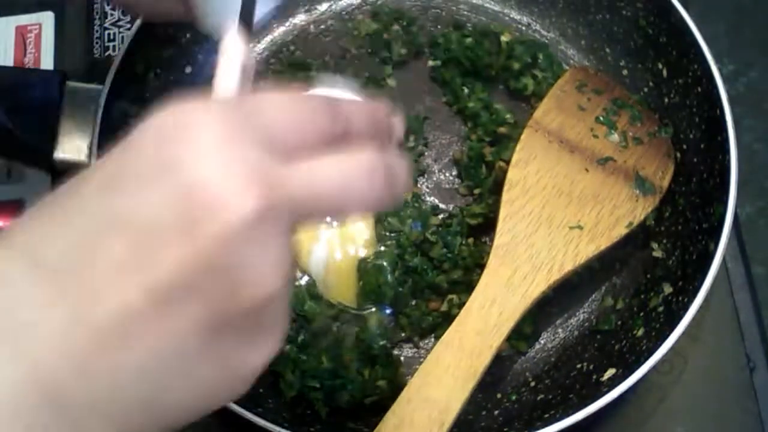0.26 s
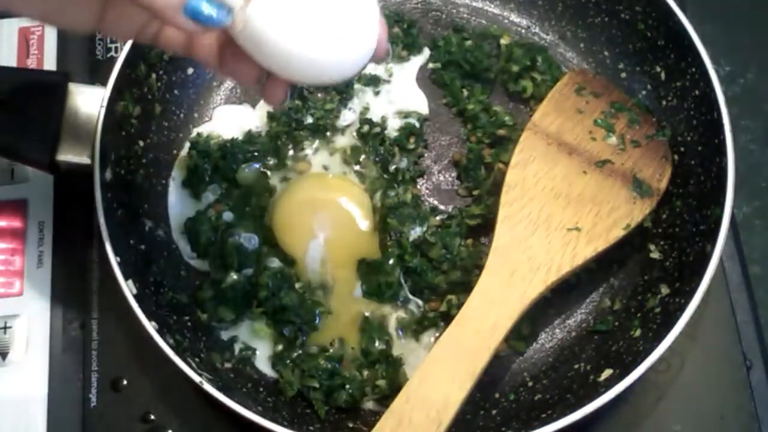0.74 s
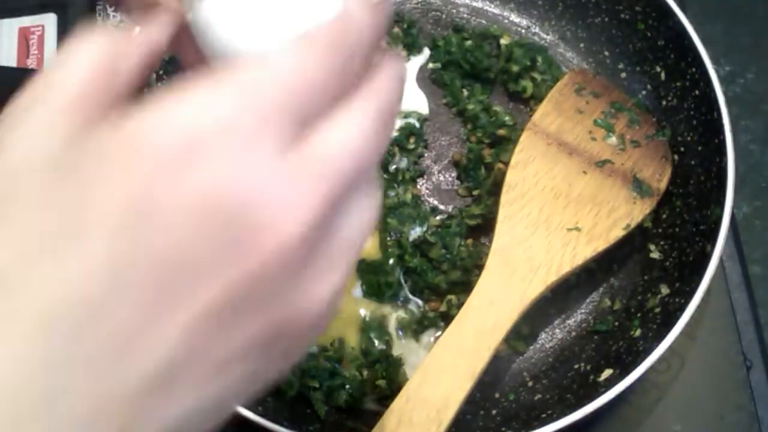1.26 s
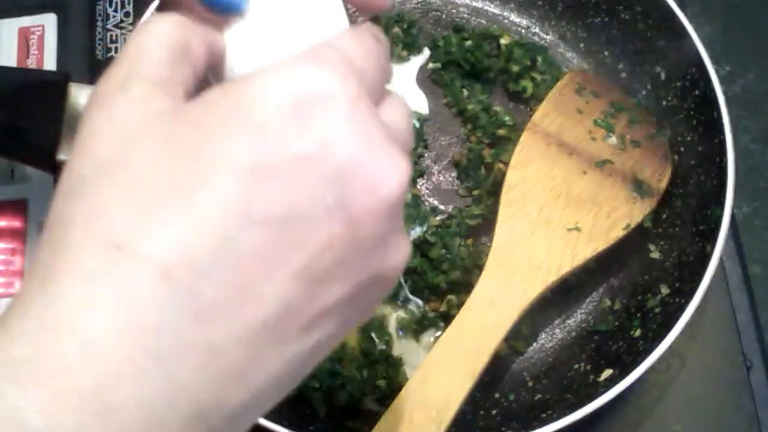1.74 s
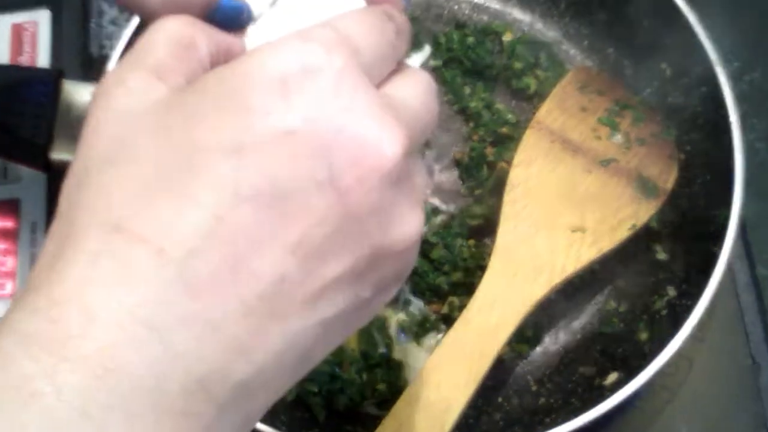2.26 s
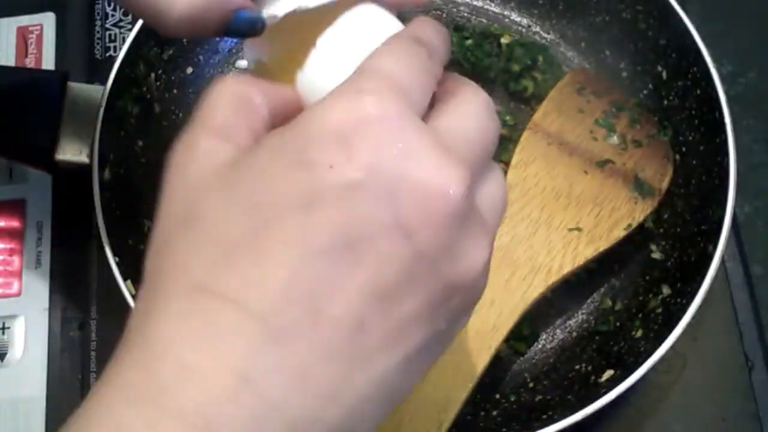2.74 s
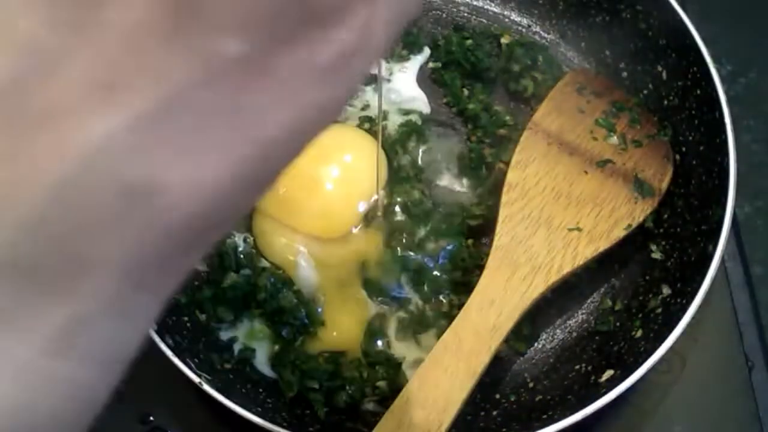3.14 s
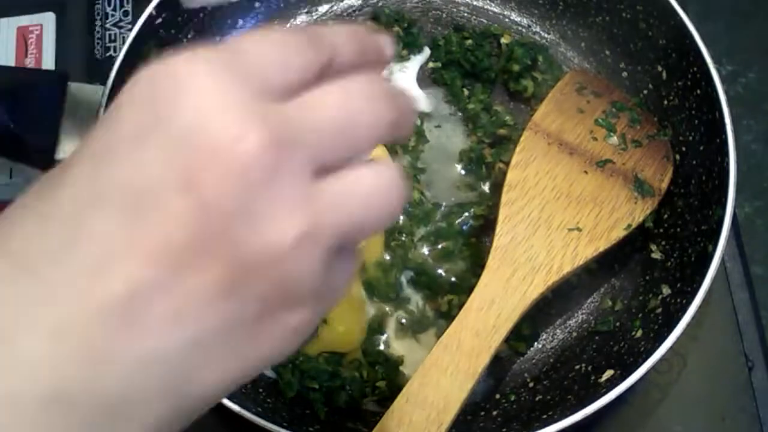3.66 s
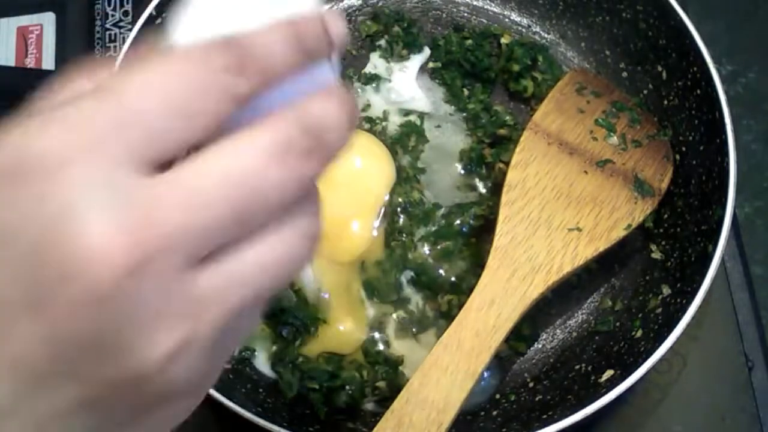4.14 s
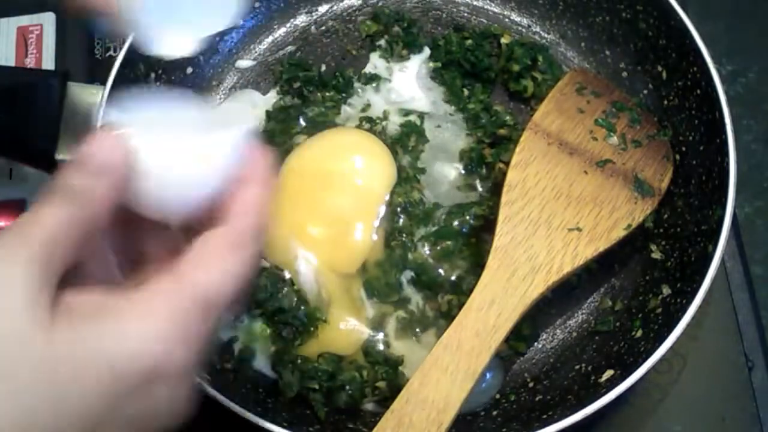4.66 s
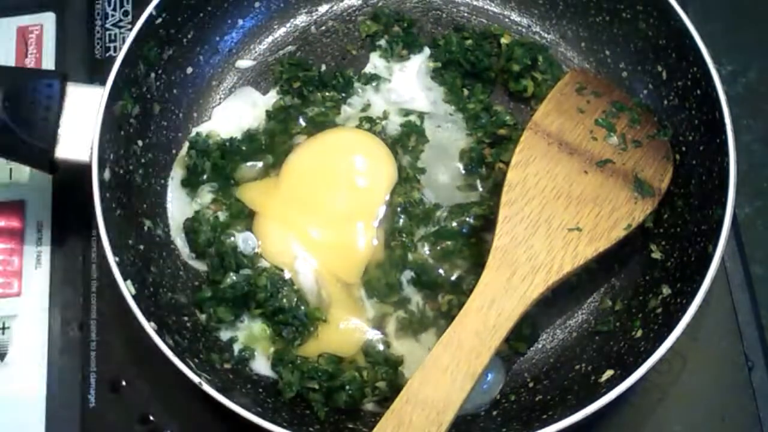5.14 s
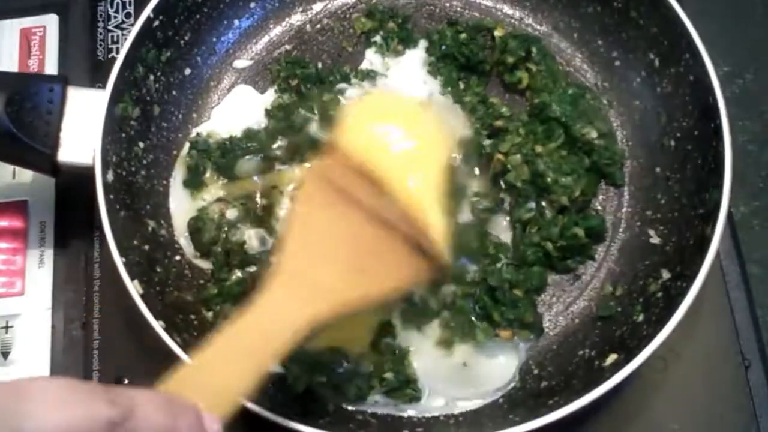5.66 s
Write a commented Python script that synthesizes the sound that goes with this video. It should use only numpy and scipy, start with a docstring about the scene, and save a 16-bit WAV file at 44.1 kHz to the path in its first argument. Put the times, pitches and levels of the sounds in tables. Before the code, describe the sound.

A nearby microphone catches a quiet hissing pan and patchy fan whirr. A bright shell knock comes first, followed under a second later by a brittle, snapping split with short room echo. Dull low bumps and one sharp click precede a fresh wet sizzle, increasingly busy with popping oil spits. Underneath, deep road rumble and a steady engine hum swell towards the end.

```python
"""Egg cracked over a hissing pan

An egg is knocked on a pan's rim and prised open in a hard-walled kitchen: bursts of micro-cracks and ticks.
The pan sizzles and bubbles (noise, damped tones), then spits; the cooker's fan whirrs and whistles (noise,
narrow resonances, sines). Outside, traffic rumble swells (noise bands) and an engine drones (gliding sine)."""
import sys
import numpy as np
from scipy import signal
from scipy.fft import rfft, irfft, next_fast_len
from scipy.io import wavfile
from scipy.ndimage import uniform_filter1d, map_coordinates

SR = 44100
rng = np.random.default_rng(int(sys.argv[2]) if len(sys.argv) > 2 else 0)


def digitize_waveform(pressure):
    """Quantize a signal to 16-bit integers and store it at the path in sys.argv[1].

    Rows of a 2-D input are taken as channels; values are limited to [-1, 1].
    """
    field = np.atleast_2d(pressure).T
    bounded = np.clip(field, -1, 1)
    quanta = np.round(bounded * 32767).astype(np.int16)
    wavfile.write(sys.argv[1], SR, quanta)


N = 259868
TIME_S = np.arange(N) / SR


def amp(db):
    """Gain of a level in dB."""
    return 10 ** (np.asarray(db) / 20)


def unit(x):
    """Scaled to rms 1."""
    return x / np.sqrt(np.mean(x ** 2) + 1e-20)


def along(points, hz):
    """Interpolate (Hz, value) points on a log frequency axis."""
    point_hz, value = np.transpose(points)
    return np.interp(np.log(hz + 1), np.log(point_hz + 1), value)


def curves(rows):
    """One value per sample for each column after the time."""
    s, *columns = np.transpose(rows)
    return [np.interp(TIME_S, s, column) for column in columns]


def filtered(x, response):
    """x times a response of frequency, zero-padded against wrap-around."""
    m = next_fast_len(N + SR // 2)
    return irfft(rfft(x, m) * response(np.fft.rfftfreq(m, 1 / SR)), m)[..., :N]


def sine(hz):
    """Steady sine of rms 1."""
    return np.sqrt(2) * np.sin(2 * np.pi * hz * TIME_S)


def wobble(knots_per_s):
    """Smooth random curve through normal knots."""
    knots = rng.standard_normal(60 + int(N * knots_per_s / SR))
    return map_coordinates(knots, [np.arange(N) * knots_per_s / SR])


def rush(spectrum, patchy_db):
    """Coloured noise of rms 1 with time-frequency patches of random gain."""
    z = signal.stft(rng.standard_normal(N), nperseg=512)[2]
    field = uniform_filter1d(rng.standard_normal(z.shape), size=4, axis=0)
    field = uniform_filter1d(field, size=12, axis=1)
    noise = signal.istft(z * amp(patchy_db * unit(field)), nperseg=512)[1][:N]
    return unit(filtered(noise, lambda hz: amp(along(spectrum, hz))))


def bubbles(rate, size_db, centre_hz, spread, cycles):
    """Bubbles of rms 1: short damped tones of scattered pitch and size."""
    when, pitch, size = rng.random((int(rate) * 6, 3)).T
    hz = centre_hz * np.exp(spread * (pitch - .5))[:, None]
    t = np.arange(int(8 * cycles * SR / centre_hz)) / SR
    envelope = t * hz * np.exp(-t * hz / cycles)
    gain = amp(-size_db * np.log(size + 0.026))[:, None]  # few large, many small
    ring = gain * np.sin(2 * np.pi * hz * t) * envelope
    place = (when * N).astype(int)[:, None] + np.arange(len(t))
    return unit(np.bincount(place.ravel(), ring.ravel(), N + len(t))[:N])


def fracture(bursts, spectrum, spiky_db):
    """Dense micro-cracks of uneven size: a plateau, then a decay."""
    size = amp(spiky_db * np.repeat(rng.standard_normal(N // 32 + 1), 32)[:N])
    cracks = unit(filtered(size * rng.standard_normal(N), lambda hz: amp(along(spectrum, hz))))
    shape = np.zeros(N)
    for s, db, hold_s, t60_s in bursts:
        fall_db = 60 * np.clip(TIME_S - s - hold_s, 0, 9) / t60_s
        shape += (TIME_S >= s) * amp(db - fall_db)
    return shape * cracks


def ring_modes(rows, rise_s):
    """Each event swells briefly and rings on one mode."""
    out, t = np.zeros(N + SR), np.arange(SR // 8) / SR
    for s, db, hz, t60_s in rows:
        swell = amp(-60 * t / t60_s) * (1 - np.exp(-t / rise_s))
        out[round(s * SR):][:len(t)] += amp(db) * swell / swell.max() * np.sin(2 * np.pi * hz * t)
    return out[:N]


# traffic swell: start_s, traffic_db, deep_bass_db
TRAFFIC = [(0.0, -57.5, -59), (0.33, -66.5, -62.5), (0.97, -58, -52), (1.15, -45.5, -53), (1.43, -46, -60),
           (1.79, -61, -51), (1.93, -60.5, -58), (2.34, -63, -65), (2.77, -47.5, -65.5), (3.05, -50, -47),
           (3.2, -51, -53), (3.38, -45.5, -50), (3.72, -51, -45), (3.92, -40.5, -40.5), (5.22, -33.5, -40),
           (5.4, -34.5, -41), (5.89, -33, -39.5)]
# deepest bass, low band, upper band colours: freq_hz, level_db_per_hz
RUMBLE = [(12, -40), (20, -21.5), (43, 7), (70, -4), (91, -35), (150, -120)]
GROWL = [(41, -32), (70, -2), (99, 2.5), (130, -11), (151, -18), (170, -20), (220, -44.5), (370, -120)]
ROAD = [(120, -18), (160, -0.5), (215, 13), (260, 2), (320, -1.5), (380, -38)]
# band laws: offset_db, growth_db_per_db, drift_db
GROWL_LAW = (-0.74, 0.64, 1.5)
ROAD_LAW = (-11, 0.6, 2.05)
RUMBLE_DRIFT_DB = 2


def traffic():
    """One swell drives two noise bands over the deepest bass, each drifting a little on its own."""
    level_db, deep_db = curves(TRAFFIC)
    mean_db = level_db.mean()
    out = amp(deep_db + RUMBLE_DRIFT_DB * wobble(8)) * rush(RUMBLE, patchy_db=2.0)
    for colour, (offset_db, growth, drift_db) in [(GROWL, GROWL_LAW), (ROAD, ROAD_LAW)]:
        band_db = mean_db + offset_db + growth * (level_db - mean_db) + drift_db * wobble(4.5)
        out += amp(band_db) * rush(colour, patchy_db=2.5)
    return out


# whirr noise level: start_s, level_db
WHIRR_DB = [(0.0, -57), (0.82, -51), (1.33, -53), (1.69, -56), (2.0, -55), (2.41, -55), (2.79, -51.5),
            (3.25, -48), (3.72, -49), (4.05, -45.5), (5.43, -45.5), (5.89, -46)]
# whirr colour: freq_hz, level_db_per_hz
WHIRR = [(200, -20), (340, -4.5), (434, -6.5), (473, -6.5), (571, -11.5), (938, -4.5), (1020, -6),
         (1180, -12), (1900, -18.5), (2470, -34), (4180, -120)]
# steady motor lines: freq_hz, level_db_re_whirr
HUM = [(275, -15), (382, -12.5)]


def fan():
    """Patchy air noise plus steady motor sines."""
    motor = sum(amp(db) * sine(hz) for hz, db in HUM)
    return amp(curves(WHIRR_DB)[0]) * (rush(WHIRR, patchy_db=3.5) + motor)


# fuzzy cooker tones: freq_hz, width_hz, level_db_re_whirr
TONES = [(474, 15.6, -10.5), (1024, 32, -12), (1527, 70, -24), (1860, 62, -16.5), (2350, 67, -29),
         (3014, 42, -13)]
# single-tone flares: peak_s, tone_hz, rms_db, length_s
FLARES = [(1.138, 473, -54, 0.16), (1.6, 473, -58, 0.26), (0.606, 1005, -56, 0.096),
          (0.807, 1005, -47.5, 0.05), (1.123, 3000, -55, 0.11), (4.443, 1005, -53, 0.14),
          (4.57, 1500, -53, 0.12), (4.96, 1005, -50, 0.16), (5.21, 1005, -54, .12),
          (5.298, 2320, -58, 0.46), (1.904, 473, -58.5, 0.36), (3.305, 473, -57, 0.55),
          (3.652, 1850, -56.5, 0.73), (3.928, 1005, -50.5, 0.26), (4.24, 473, -43, 0.094),
          (4.048, 473, -44.5, 0.056), (4.621, 473, -44, 0.052), (4.745, 473, -45, 0.071),
          (5.57, 1005, -49.5, 0.34), (5.85, 473, -44.5, 0.32)]
FLICKER_DB, FLICKERS_PER_S = 3, 14
FLUTTER_DB, FLUTTERS_PER_S = 2.5, 25  # of the flares


def fuzzy_tones():
    """Noise in narrow resonances that follow the whirr, flicker and flare."""
    whirr_db = curves(WHIRR_DB)[0]
    out = np.zeros(N)
    for hz, width_hz, db in TONES:
        line = unit(filtered(rng.standard_normal(N), lambda f: width_hz ** 2 / (width_hz ** 2 + (f - hz) ** 2)))
        flares = np.zeros(N)
        for s, tone_hz, top_db, length_s in FLARES:
            if abs(np.log(tone_hz / hz)) < np.log(11 / 10):
                flares += amp(top_db) * np.exp(-(2 * (TIME_S - s) / length_s) ** 2)
        steady = amp(whirr_db + db + FLICKER_DB * wobble(FLICKERS_PER_S))
        out += (steady + flares * amp(FLUTTER_DB * wobble(FLUTTERS_PER_S))) * line
    return out


# electronic whines: freq_hz, rms_db at WHINE_ON_S, change_db_per_s
WHINES = [(3001, -68, 0), (3503, -70, 0), (3602, -62.5, -.2), (4802, -74, 0), (5302, -65, -.7),
          (5403, -65, -1.4)]
WHINE_ON_S, WHINE_IDLE_DB, WHINE_WAVER_DB = 1.25, -12, 1.8


def whines():
    """Thin sines of the cooker's electronics, stepping up once and wavering."""
    power_db = np.where(TIME_S < WHINE_ON_S, WHINE_IDLE_DB, 0)
    out = np.zeros(N)
    for hz, db, change_db_per_s in WHINES:
        waver_db = WHINE_WAVER_DB * (wobble(3) + wobble(20))
        out += amp(db + change_db_per_s * (TIME_S - WHINE_ON_S) + power_db + waver_db) * sine(hz)
    return out


SIMMER_DB = -7  # re whirr


def simmer():
    """Low bubbling under the greens, following the whirr level."""
    low = bubbles(rate=60, size_db=5.0, centre_hz=743.0, spread=1.306, cycles=4.7)
    return amp(curves(WHIRR_DB)[0] + SIMMER_DB) * low


# sizzle level: start_s, level_db
FRYING_DB = [(0.0, -56.5), (1.33, -47), (1.62, -56.5), (1.87, -55), (2.03, -49), (2.36, -58.5), (2.58, -58),
             (3.62, -53), (3.74, -49), (4.05, -52.5), (5.28, -47), (5.89, -44)]
# sizzle colour: freq_hz, level_db_per_hz
SIZZLE = [(880, -31), (1500, -2), (1660, -6), (2150, -7.5), (2800, 5), (3160, -8), (3490, -4), (3780, -5.5),
          (4600, -12), (5980, -48), (10100, -120)]
SPLUTTER_FROM_S, SPLUTTER_DB = 3.7, -8  # mean level re sizzle


def frying():
    """Sizzle of noise and bubbles; the wet egg later adds clumps of splutter."""
    fine = bubbles(rate=300, size_db=3, centre_hz=2750, spread=.5, cycles=5)
    sizzle = unit(rush(SIZZLE, patchy_db=3.5) + amp(-3.5) * fine)
    wet = np.clip((TIME_S - SPLUTTER_FROM_S) / .2, 0, 1)
    clumps = amp(SPLUTTER_DB + 5 * wobble(10))
    splutter = wet * clumps * bubbles(rate=90, size_db=3.5, centre_hz=2735, spread=.45, cycles=8)
    return amp(curves(FRYING_DB)[0]) * (sizzle + splutter)


# fine hiss level: start_s, level_db
HISS_DB = [(0, -59), (1.2, -56.5), (2.6, -60), (4, -57.5), (5.89, -57)]
# hiss colour: freq_hz, level_db_per_hz
HISS = [(2350, -35), (4000, -6), (4490, -7.5), (5510, 0.5), (5910, -5), (6560, -8.5), (8170, -4.5),
        (9350, -13.5), (12600, -22), (13200, -16)]
FIZZ_DB = -10  # mean level re hiss


def hiss():
    """Fine noise with small high bubbles."""
    fizz_gain = amp(FIZZ_DB + 2.5 * wobble(7))
    fizz = fizz_gain * bubbles(rate=120, size_db=2, centre_hz=5600, spread=.4, cycles=14)
    return amp(curves(HISS_DB)[0]) * (rush(HISS, patchy_db=1.6) + fizz)


# short pitched ticks and one longer 1 kHz ring: start_s, peak_db, pitch_hz, t60_s
TICKS = [(.2615, -35, 2130, 0.0099), (0.283, -29.5, 2105, 0.023), (1.062, -38.5, 1005, 0.16),
         (1.255, -27.5, 315, 0.1), (1.246, -21.5, 960, .05), (1.876, -18, 4440, 0.014),
         (3.693, -21, 3170, 0.0088), (3.694, -41.5, 7200, 0.0043), (3.707, -32.5, 2890, 0.02)]


def ticks():
    """Short pitched ticks and one longer 1 kHz ring, each a single damped mode."""
    return ring_modes(TICKS, rise_s=0.00057)


# loudest oil spits: start_s, peak_db, pitch_hz
SPITS = [(.405, -58, 5355), (.503, -47.5, 5840), (.52, -50.5, 6630), (.6, -51, 5640), (.615, -51, 6050),
         (0.696, -58, 4970), (.81, -57.5, 5140), (.86, -56, 5370), (4.995, -42, 2030), (5.09, -36.5, 2903),
         (5.125, -37, 2730), (5.185, -42, 2780), (5.277, -41, 2080), (5.393, -41, 2330),
         (4.246, -34.5, 2740), (4.591, -36.5, 2783), (4.683, -38.5, 2748), (4.764, -46, 5770),
         (4.937, -39.5, 3004), (5.0048, -46, 5770), (5.006, -37.5, 2700), (5.066, -34.5, 2610),
         (5.109, -46.5, 5920), (5.149, -33, 2810), (5.171, -35.5, 2860), (5.2332, -37, 2350),
         (5.37, -39, 3370), (5.4568, -34.5, 2866), (5.556, -34.5, 2907), (5.605, -42, 5670),
         (5.647, -34.5, 3044), (5.839, -35.5, 2420)]
SPIT_T60_S, SPIT_RISE_S = 0.02, .002
SPRAY_S, SPRAY_PITCH_RATIO, SPRAY_DB = .05, 0.045, -7.5  # droplets: time spread, pitch spread, level re spit


def spits():
    """Each spit is one pop followed by four smaller droplets near its pitch."""
    pops = [(s, db, hz, SPIT_T60_S) for s, db, hz in SPITS]
    drops = []
    for s, db, hz in SPITS:
        for u, v in rng.random((4, 2)):
            drop_hz = hz * (1 + SPRAY_PITCH_RATIO * (2 * v - 1))
            drops.append((s + SPRAY_S * u, db + SPRAY_DB, drop_hz, SPIT_T60_S))
    return ring_modes(pops + drops, rise_s=SPIT_RISE_S)


# knock bursts: start_s, crackle_db, plateau_s, t60_s
KNOCKS = [(1.2438, -11.5, 0.0006, .012), (1.244, -7.5, 0.009, 0.065), (1.2525, -12, .001, .012),
          (1.2585, -12.5, .001, .012), (1.2675, -16, .001, .012), (1.274, -16.5, .001, .012),
          (1.2795, -23, .001, .012)]
# knock colour: freq_hz, level_db_per_hz
KNOCK = [(35, -46.5), (60, -20.5), (185, -19), (319, -6.5), (470, -19.5), (921, -5.5), (1620, -12.5),
         (2320, -2.5), (4180, -1.5), (5400, -5.5), (6900, 0.5), (8030, 1), (9000, -3.5), (10000, -16.5),
         (13200, -13)]


def knock():
    """Shell fractures on the pan's rim in a run of short bursts."""
    return fracture(KNOCKS, KNOCK, spiky_db=4.5)


# prising burst: start_s, crackle_db, plateau_s, t60_s
PRISES = [(1.876, -25.5, .003, 0.035)]
# prising colour: freq_hz, level_db_per_hz
PRISE = [(180, -47.5), (300, -19.5), (522, -11), (788, -19.5), (953, -40.5), (1100, -33), (1690, -29.5),
         (2350, -30), (2540, -27), (3380, -5.5), (4290, -4), (5610, -36.5), (8340, -23), (12400, -36),
         (13200, -44)]


def prise():
    """Brief crackle as the shell is prised."""
    return fracture(PRISES, PRISE, spiky_db=5.5)


# splitting burst: start_s, crackle_db, plateau_s, t60_s
SPLITS = [(1.952, -9.5, 0.018, 0.094)]
# single snaps: start_s, crackle_db
SNAPS = [(1.9535, -8), (1.9635, -10), (1.9695, -12), (1.9748, -6), (1.9806, -7), (1.9855, -12),
         (1.9965, -13), (2.0195, -16), (2.0272, -10)]
# splitting colour: freq_hz, level_db_per_hz
SPLIT = [(18, -48.5), (30, -9), (135, -25), (250, -10.5), (500, -16.5), (1170, -19.5), (2400, -16.5),
         (3990, -10.5), (5410, -17), (6900, -6), (8140, 0.5), (9000, -7), (10000, -17), (11500, -16.5),
         (13200, -20.5)]


def split():
    """Shell splits: one longer crackle plus single short snaps."""
    snaps = [(s, db, .0008, .012) for s, db in SNAPS]  # plateau_s, t60_s
    return fracture(SPLITS, SPLIT, spiky_db=4.5) + fracture(snaps, SPLIT, spiky_db=-2.5)


# soft low thumps: start_s, level_db, pitch_hz
THUMPS = [(2.439, -46.5, 111), (2.517, -40, 89), (2.58, -35, 97), (2.687, -35, 95), (2.784, -37, 99),
          (3.251, -35.5, 91), (3.302, -31, 96), (3.442, -32.5, 84)]


def thumps():
    """A few cycles of bass under a smooth rise and fall."""
    out, t = np.zeros(N + SR), np.arange(SR // 5) / SR
    envelope = np.e * t / 0.0096 * np.exp(-t / 0.0094)
    for s, db, hz in THUMPS:
        out[round(s * SR):][:len(t)] += amp(db) * envelope * np.sin(2 * np.pi * hz * t)
    return out[:N]


# sliver snap and rattle: start_s, level_db
CLICKS = [(3.2274, -5), (3.2298, -16), (3.2303, -17), (3.2325, -23), (3.2342, -24)]
# sliver colour: freq_hz, level_db_per_hz
CLICK = [(300, -19), (1500, -31), (3200, -9), (4500, -14.5), (5600, -13.5), (7000, 6), (8500, -7),
         (9500, -18), (11300, -15), (13200, -23.5)]


def clicks():
    """A sliver of shell snaps off and rattles: sharp coloured impulses."""
    colour = lambda hz: amp(along(CLICK, hz))
    blows = np.zeros(N)
    for s, db in CLICKS:
        blows[round(s * SR)] = amp(db)
    return filtered(blows, colour) / np.mean(colour(np.linspace(0, SR / 2, num=999)))


# membrane tear: start_s, crackle_db, plateau_s, t60_s
TEAR = [(3.235, -53.5, 0.096, 0.6)]
# membrane colour: freq_hz, level_db_per_hz
RIP = [(2000, -40), (4100, -22), (5320, -6), (6300, -2), (7300, 0), (9330, -12), (13200, -19)]


def tear():
    """The membrane tears after the sliver: faint high crackle, slow decay."""
    return fracture(TEAR, RIP, spiky_db=4.0)


# passing engine: start_s, pitch_hz, rms_db
DRONE = [(3.7, 69.9, -46), (4.1, 69.7, -39), (4.4, 70.18, -44.5), (4.8, 70.14, -35), (5.3, 70.3, -31),
         (5.6, 69.8, -32), (5.89, 70.6, -37)]


def engine():
    """A low firing tone that fades in as the vehicle nears."""
    hz, db = curves(DRONE)
    fade = np.clip((TIME_S - DRONE[0][0]) / 0.082, 0, 1)
    return np.sqrt(2) * fade * amp(db) * np.sin(2 * np.pi * np.cumsum(hz) / SR)


# room decay: freq_hz, t60_s
KITCHEN = [(200, 0.38), (1500, 0.39), (4500, 0.34), (8000, 0.37), (13000, 0.38)]


def kitchen(x):
    """Each frequency dies at its own speed; a fainter, slower tail comes back from the next room."""
    hz, t, z = signal.stft(rng.standard_normal(SR), SR, nperseg=256)
    fall_db = -60 * t / along(KITCHEN, hz)[:, None]
    tail = signal.istft(z * (amp(fall_db) + amp(0.31 * fall_db - 22.0)), SR, nperseg=256)[1]
    delayed = np.pad(x, (100, 0))
    return signal.fftconvolve(delayed, tail / np.linalg.norm(tail))[:N]


WIDE_HZ = 4300


def widen(x):
    """Both channels share the bass; above WIDE_HZ a phase-scrambled copy is added left, subtracted right."""
    _, _, z = signal.stft(x, SR, nperseg=128)
    random_phase = np.exp(2j * np.pi * rng.random(z.shape))
    scrambled = signal.istft(z * random_phase, SR, nperseg=128)[1][:N]
    late = np.pad(scrambled, (128, 0))[:N]
    side = amp(-4.0) * filtered(late, lambda hz: hz > WIDE_HZ)
    return np.array([x + side, x - side])


def scene():
    """The egg and the spits sound directly and through the room, over the background."""
    knocked, opened, click = knock(), split(), clicks()
    small = ticks() + prise() + spits() + tear()
    room = amp(-7.0) * kitchen(knocked) + amp(-6.5) * kitchen(opened)
    room += amp(-2.0) * kitchen(small) + amp(-12) * kitchen(click)
    cooker = fan() + fuzzy_tones() + whines()
    pan = simmer() + frying() + hiss()
    outside = traffic() + engine()
    direct = knocked + opened + click + small
    return np.tile(direct + room + cooker + pan + outside + thumps(), (2, 1))


TOP_HZ = 13250


def record(dry):
    """Soft clipping at full scale, stereo widening of the treble, then a low-pass around TOP_HZ."""
    clipped = dry[0] / (1 + np.abs(dry[0]) ** 8) ** (1 / 8)
    return filtered(widen(clipped), lambda hz: np.clip((TOP_HZ - hz) / 250 + .5, 0, 1) ** 2)


dry = scene()
out = record(dry)
digitize_waveform(out)
```